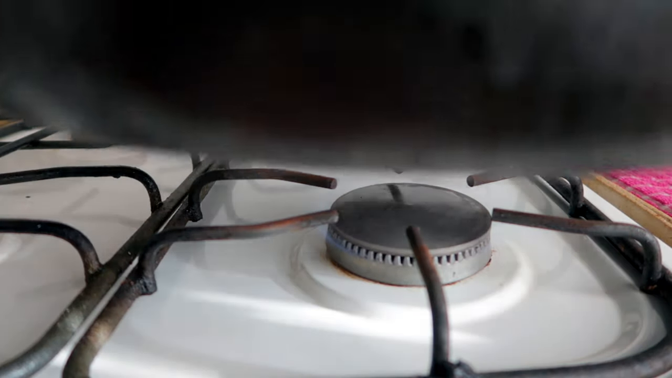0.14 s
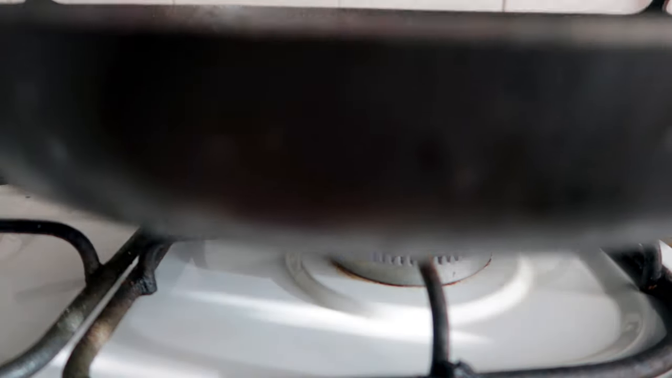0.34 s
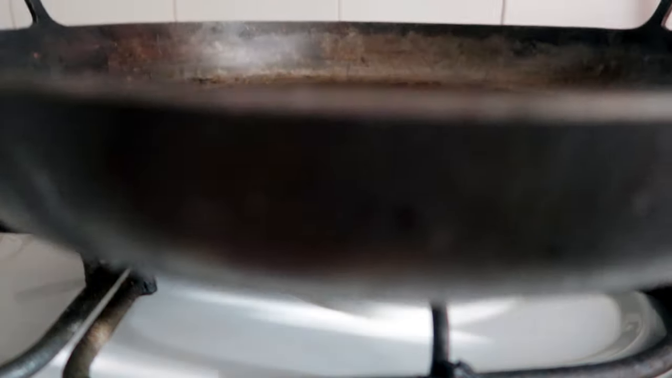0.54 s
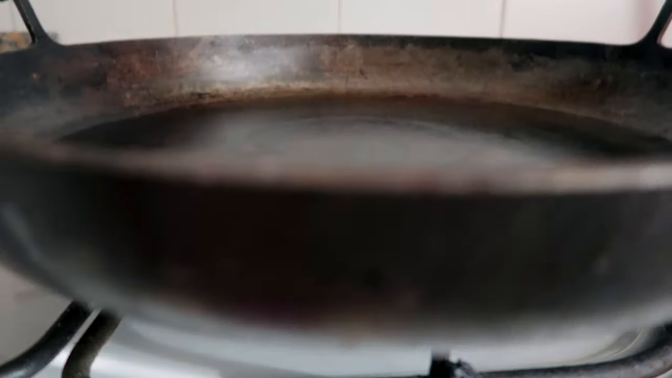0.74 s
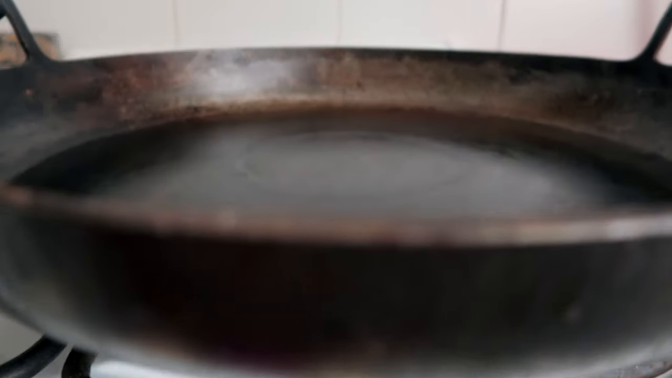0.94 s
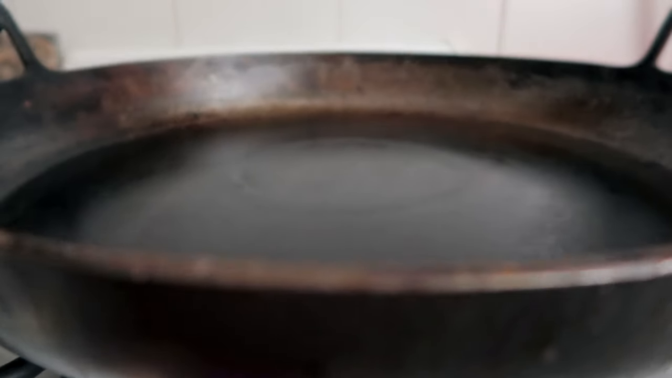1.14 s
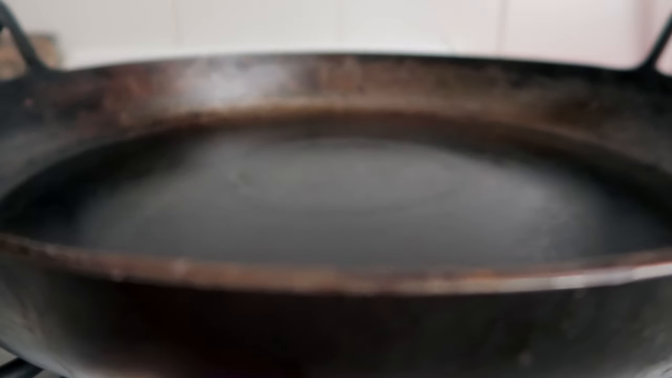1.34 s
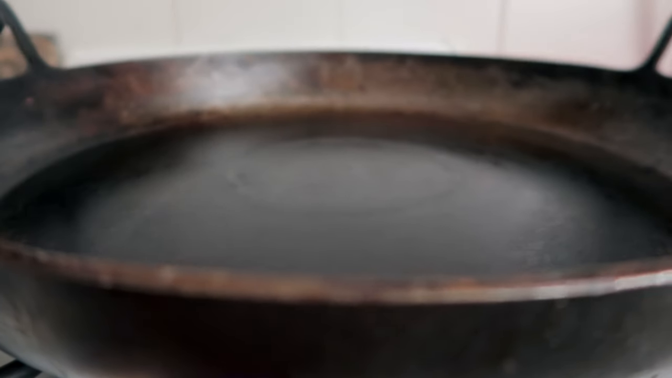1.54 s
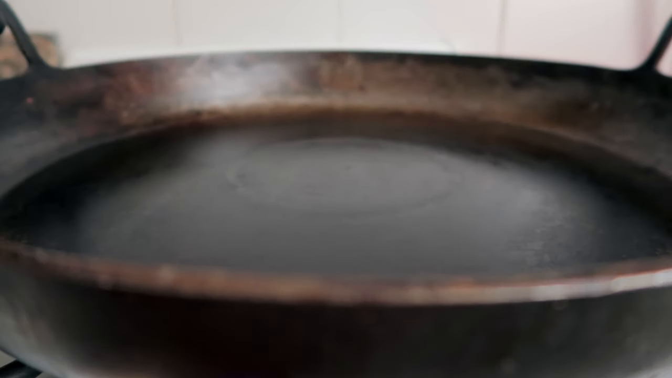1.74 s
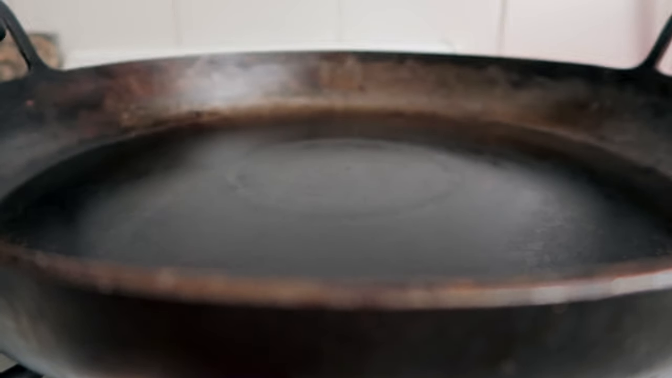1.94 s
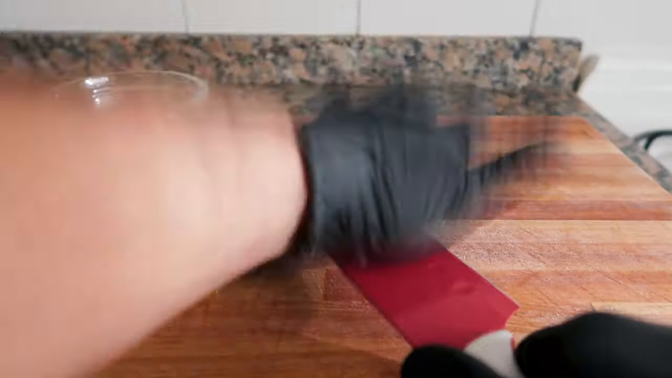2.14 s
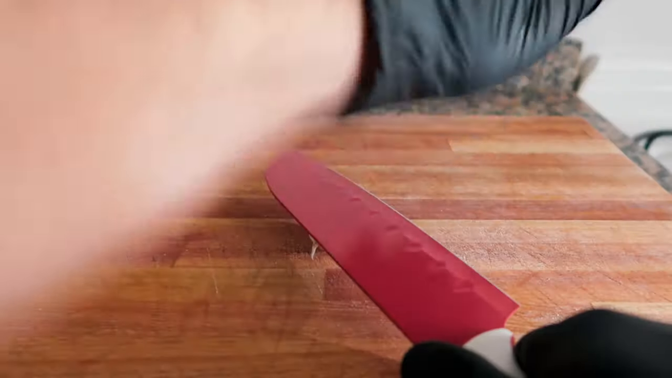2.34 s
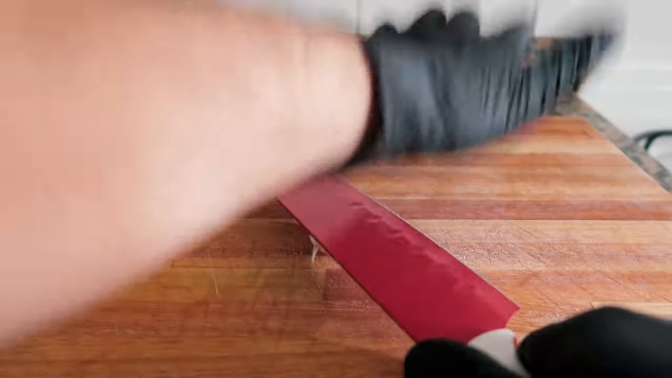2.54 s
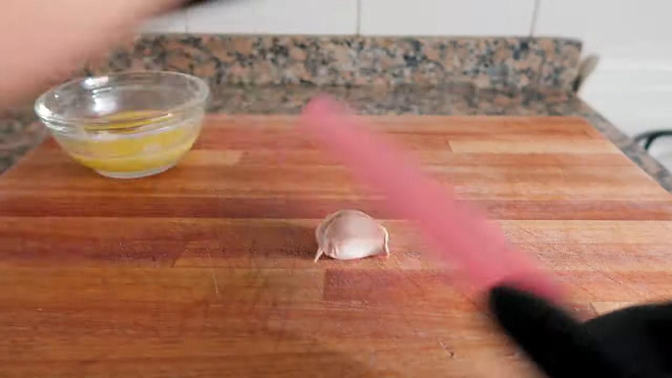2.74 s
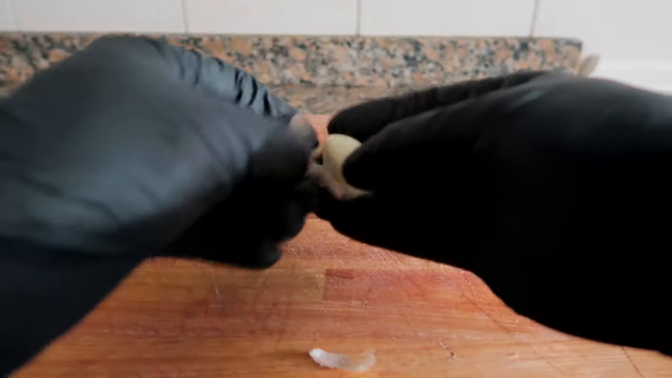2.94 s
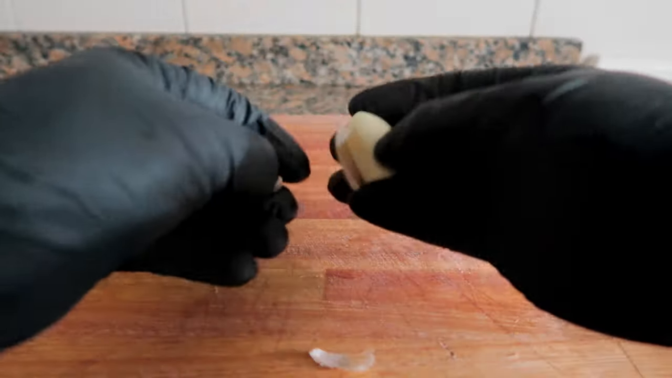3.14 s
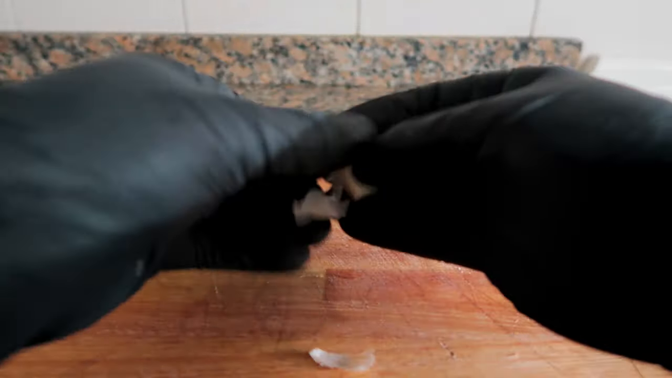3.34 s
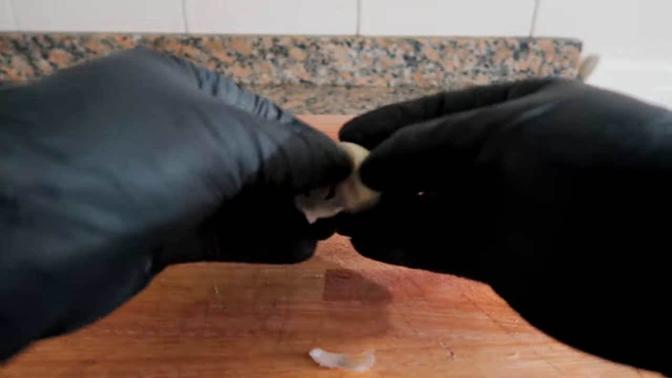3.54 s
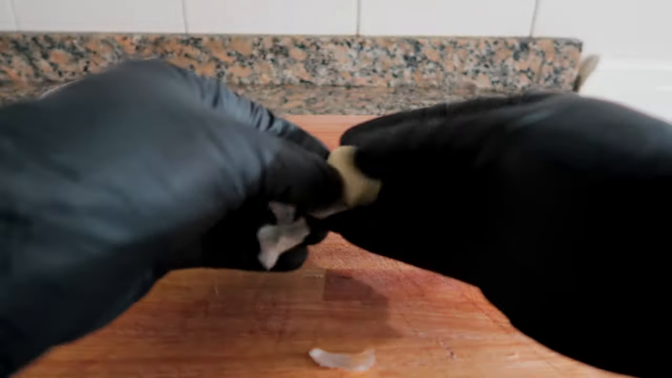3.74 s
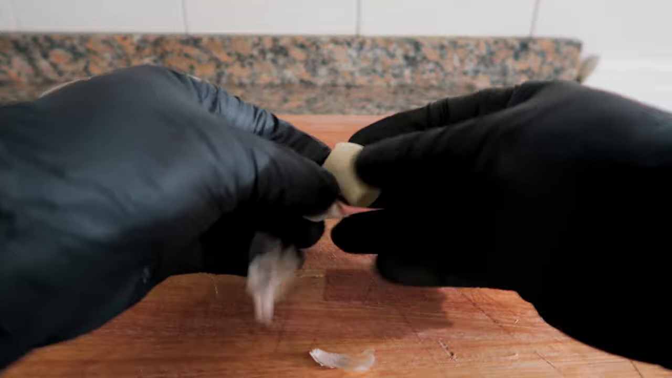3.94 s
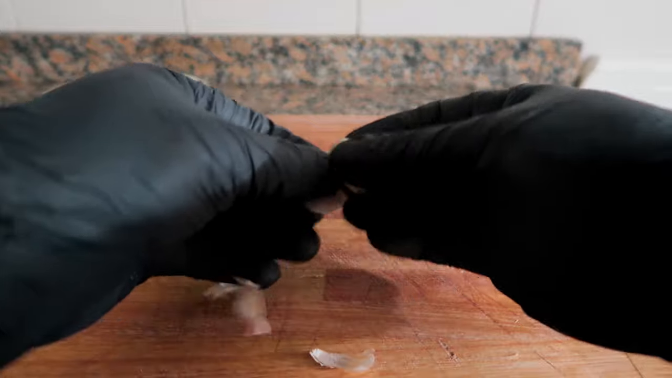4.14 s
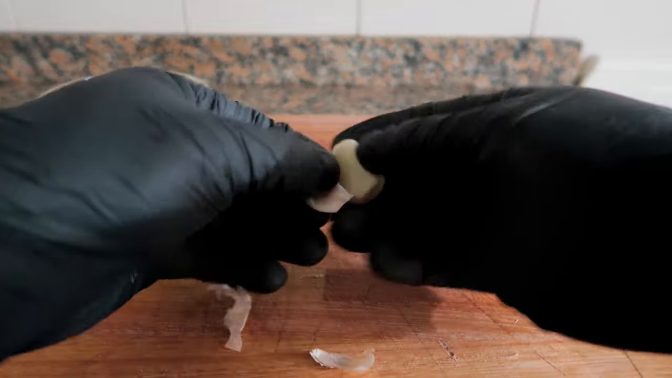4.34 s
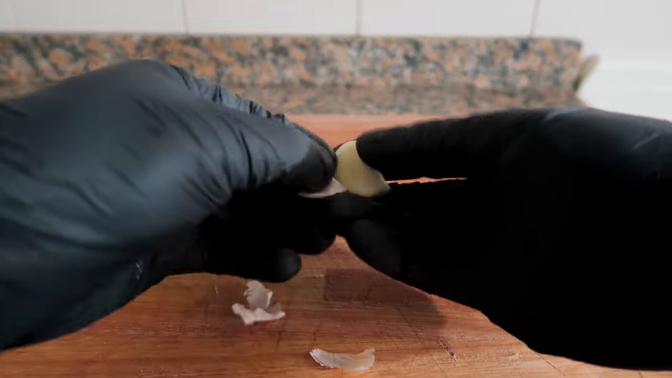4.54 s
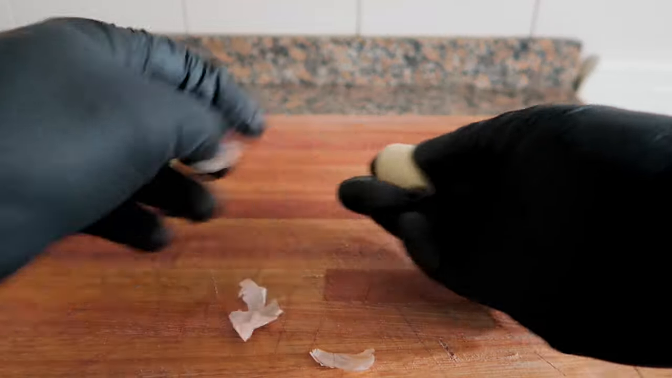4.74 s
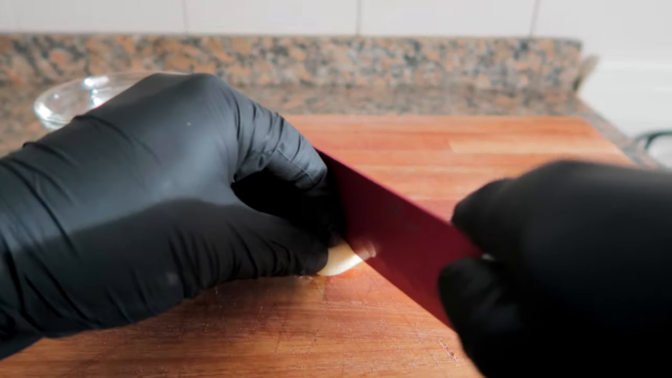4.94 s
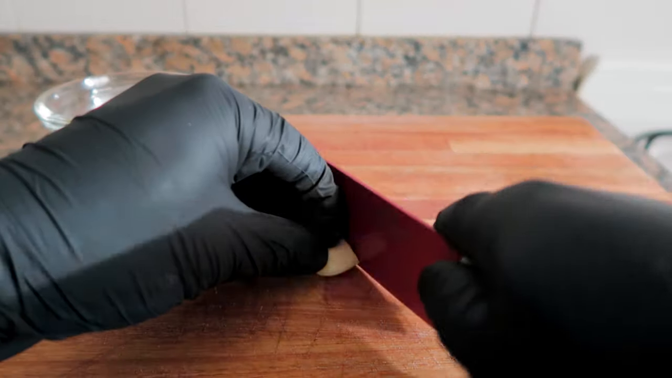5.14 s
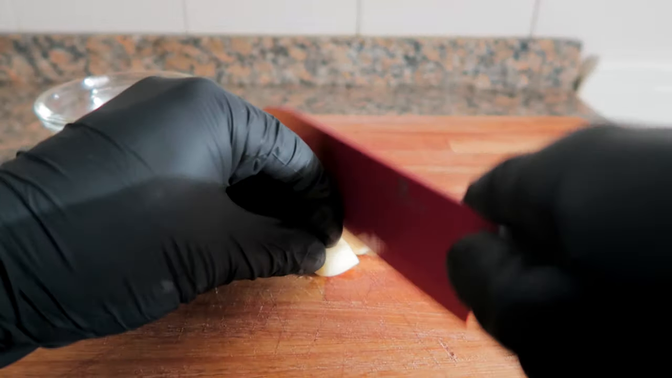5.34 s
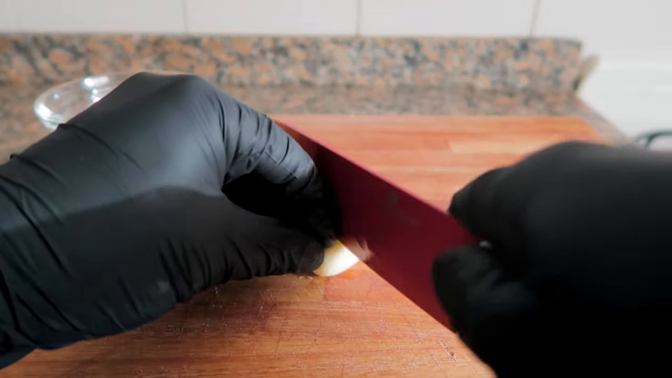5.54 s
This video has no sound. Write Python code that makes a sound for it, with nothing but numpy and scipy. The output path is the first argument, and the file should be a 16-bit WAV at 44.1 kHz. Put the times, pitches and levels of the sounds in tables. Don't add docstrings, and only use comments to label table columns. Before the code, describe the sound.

Close kitchen sounds: pan clunks down on a metal grate, flat blade smacks twice, dry peel snaps, and a knife knocks through to the board.

```python
import sys
import numpy as np
from scipy import signal
from scipy.fft import rfft, irfft
from scipy.io import wavfile
from scipy.ndimage import uniform_filter1d

SR = 44100
rng = np.random.default_rng(int(sys.argv[2]) if len(sys.argv) > 2 else 0)


def ratio_of_db(decibels):
    return 10 ** (np.asarray(decibels, float) / 20)


def unload_audio(sound):
    columns = np.transpose(np.atleast_2d(sound))
    steps = np.round(np.clip(columns, -1, 1) * 32767)
    wavfile.write(sys.argv[1], SR, steps.astype(np.int16))


N = 246519

# start_s, crack_db, body_db, rise_s, ring_db
PAN_BLOWS = [
    (1.1775, -10, -5.5, 0.0032, -7),
    (1.2585, -5, -8.5, 0.0053, -13),
    (1.6098, -23, -13.5, 0.0013, -18.5),
]
# pitch_hz, level_db (per Hz)
PAN_CRACK = [(150, -12), (844, -8), (1340, 6.5), (2230, -20), (4200, -3.5), (5330, -52), (15500, -75)]
# pitch_hz, level_db (per Hz)
PAN_BODY = [
    [(41, -42), (70, -11), (260, -1.5), (478, 0), (1350, -13.5), (2270, -16), (3120, -22), (4370, -25),
     (15500, -68)],
    [(41, -48), (70, -18), (254, -1.5), (641, -12.5), (840, -6.5), (2800, -18.5), (4400, -18.5),
     (5600, -32), (15500, -76)],
    [(41, -31), (70, -5), (300, -2), (717, -11), (1200, -9), (2030, -20.5), (4000, -28.5), (15500, -79)],
]
# pitch_hz, t60_s
PAN_DECAY = [(60, 0.86), (160, 0.98), (420, 0.68), (1100, 0.41), (2910, 0.33), (7680, 0.26)]
# pitch_hz, level_db, t60_s
PAN_TOUCH = [(139, -2.5, 0.21), (276, -2.5, 0.27), (459, 9, 0.1), (849, -8.5, 0.44), (1278, -13, 0.61),
             (1690, -9.5, .19), (1860, -6.5, 0.15), (2266, -10.5, 0.26), (3310, -18, 0.16),
             (3892, -16, 0.22), (4285, -19.5, 0.33), (4470, -28, .3)]
# pitch_hz, level_db, t60_s
PAN_LAND = [(841, -1, 0.68), (1296, -7, 0.82), (1524, -20, 1), (1856, -8, 0.56), (2250, -13.5, 0.73),
            (2940, -9, 0.33), (3350, -15.5, 0.6), (3450, -16, 0.52), (137.8, -9, 1.), (242, 3.5, 0.71),
            (281, 12, 0.17), (295, -2.5, 0.72), (803, 12, 0.11)]
# pitch_hz, level_db, t60_s
GRATE = [(3122, -16, .35), (3898, -6, .3), (3984, -12, .4), (4145, -15, .25), (4290, 2, .37),
         (4339, -1, .25), (5001, -11, .3), (5319, -16, .45), (5432, -23, .25), (6200, -18, .12),
         (7079, -26, .25), (8775, -30, .25)]
# pitch_hz, level_db, t60_s
PAN_ROCK = [(238, -1, 0.78), (276, -12, 0.28), (463, -2, 0.43), (845, -10, 1.93), (974, 16, 0.019),
            (1284, 0, 0.35), (1588, 1.5, 0.38), (1860, -7.5, 0.27), (2244, -18.5, 0.71), (2580, -9, 0.066),
            (3424, -14, 0.22), (4090, 6, 0.013)]


def pan_on_hob():
    rings = [PAN_TOUCH, PAN_LAND + GRATE, PAN_ROCK]
    struck = blows(PAN_BLOWS, PAN_CRACK, 0.094, PAN_BODY, PAN_DECAY, rings)
    return struck * np.interp(np.arange(N) / SR, [2.08, 2.18], [1, 0])


# start_s, crack_db, body_db, rise_s, ring_db
SLAPS = [
    (2.2745, -0.5, -12.5, 0.0068, -23),
    (2.5288, 8, -2.5, 0.0012, -11.5),
]
# pitch_hz, level_db (per Hz)
SLAP_CRACK = [(88, -35), (150, -8), (583, -19), (1290, 2.5), (2600, 0.5), (4650, -13.5), (5650, -15.5),
              (12300, -22.5), (15500, -21)]
# pitch_hz, level_db (per Hz)
SLAP_BODY = [
    [(18, -37), (30, 3.5), (123, -3), (830, -22.5), (945, -32), (1330, -20), (1870, -21.5), (2360, -18),
     (3880, -29), (15500, -35.5)],
    [(18, -37), (30, -6.5), (230, -0.5), (307, -15.5), (852, -18), (1050, -17.5), (1170, -17.5),
     (2760, -13.5), (3680, -17.5), (15500, -31)],
]
# pitch_hz, t60_s
SLAP_DECAY = [(40, 0.16), (110, 0.6), (280, 0.55), (740, 0.39), (1940, 0.37), (5120, 0.38), (13500, 0.19)]
# pitch_hz, level_db, t60_s
SLAP_RING = [
    [(52, 5.5, 0.67), (115.3, 7.5, 0.35), (185, -15, 0.25), (1138, -14, 0.46), (1600, -7, 0.19),
     (2070, -10, 0.48), (2360, -8, 0.42), (2400, -5, .2), (2890, 5, .14), (4800, -16, .18)],
    [(57.2, -0.5, 0.63), (72, -2.5, 0.76), (123, -19, 0.36), (163, -2, 0.7), (212, -9, 0.45),
     (245.4, -0.5, 0.46), (926, -1, 0.19), (1252, -5, 0.29), (1716, -14, 0.24), (2385, -6, 0.35),
     (2800, -4, 0.28), (4060, -10, 0.25), (4350, -12, 0.42), (4900, -12, .27)],
]


def knife_slaps():
    return blows(SLAPS, SLAP_CRACK, 0.042, SLAP_BODY, SLAP_DECAY, SLAP_RING)


# start_s, crack_db, body_db, rise_s, ring_db
CHOP = [
    (5.176, 8.5, -3, 0.0017, -9),
]
# pitch_hz, level_db (per Hz)
CHOP_CRACK = [(150, -6.5), (600, -38), (930, 1), (1120, -6), (1350, 4), (1750, -10), (3000, -20),
              (15500, -44)]
# pitch_hz, level_db (per Hz)
CHOP_BODY = [
    [(18, -32), (30, -40), (148, -12), (230, -6), (455, -14), (747, -10.5), (1230, -6), (1720, -19),
     (2020, -22), (3880, -42), (15500, -62)],
]
# pitch_hz, t60_s
CHOP_DECAY = [(60, 0.82), (160, 0.58), (420, 0.45), (1100, 0.39), (2910, 0.44), (7680, 0.16)]
# pitch_hz, level_db, t60_s
CHOP_RING = [
    [(235.4, 3.5, 0.47), (356, 1.5, 0.28), (548, -4, 0.35), (693, -15, .26), (814, -16, 0.43),
     (892, 7, 0.19), (1054, -8, 0.36), (1126, -3, 0.29), (1214, 4, 0.31), (1274, 3, 0.27), (1440, -7, 0.34),
     (1478, -5, 0.36), (1575, -10.5, 0.42), (2067, -6, .22)],
]


def chop():
    return blows(CHOP, CHOP_CRACK, 0.037, CHOP_BODY, CHOP_DECAY, CHOP_RING)


def blows(rows, crack, crack_t60, bodies, decay, rings):
    out, t = np.zeros(N), np.arange(SR) / SR
    for (s, crack_db, body_db, rise, ring_db), colour, modes in zip(rows, bodies, rings):
        contact = evened(coloured(rng.standard_normal(SR), crack))
        hit = ratio_of_db(crack_db - 60 * t / crack_t60) * contact
        hit += ratio_of_db(body_db) * body(colour, decay, rise)
        for hz, db, t60 in modes:
            fall = ratio_of_db(ring_db + db - 60 * t / min(t60, 1.7))
            hit += fall * swell(t, hz, rise) * np.sin(2 * np.pi * hz * t)
        add(out, s, hit)
    return out


def body(colour, decay, rise):
    lump_db, lump_bins = 1.5, 45
    t, hz = np.arange(SR) / SR, np.fft.rfftfreq(SR, 1 / SR)
    lumps = ratio_of_db(lump_db * evened(uniform_filter1d(rng.standard_normal(len(hz)), lump_bins)))
    noise = rfft(evened(coloured(rng.standard_normal(SR), colour)))
    noise = noise * lumps / np.sqrt(np.mean(lumps ** 2))
    centres, out = [f for f, _ in decay], np.zeros(SR)
    for share, (f, t60) in zip(np.eye(len(decay)), decay):
        part = irfft(noise * read(list(zip(centres, share)), hz), SR)
        out += part * ratio_of_db(-60 * t / t60) * swell(t, f, rise)
    return out


def swell(t, hz, rise):
    return 1 - np.exp(-t / (abs(rise) * np.sqrt(500 / hz) + 1e-4))


# start_s, peak_db, pitch_hz, treble_db (against the ring)
SNAPS = [(2.9579, -17, 4540, -5), (3.0203, -16, 3830, -4), (3.044, -1, 4390, -1), (3.0646, -14, 4570, -1),
         (3.0706, -15, 1660, -7), (3.0783, -14, 3790, 0), (3.1202, -4, 3920, -3), (3.1248, -6, 3770, -6),
         (3.1368, -2, 1460, -2), (3.2163, -10, 2890, 7), (3.2231, -14, 3320, 7), (3.2422, -19, 2970, -3),
         (3.3014, -11, 3140, -1), (3.48, -23, 7000, 3), (3.6869, -16, 2970, 3), (3.699, -10, 2990, -3),
         (3.7099, -11, 2970, 5), (3.7144, -13, 3060, 3), (3.7214, -10, 3100, 3), (3.728, -15, 3060, -1),
         (3.771, -19, 3850, -5), (3.8488, -8, 5340, 6), (3.9882, -9, 5920, 3), (3.9948, -14, 2220, -10),
         (4.0198, -5, 1940, 7), (4.0286, -12, 1680, 1), (4.1003, -8, 2400, 0), (4.218, -10, 2130, 3),
         (4.3281, -20, 5040, 7), (4.3809, -25, 4410, -4)]
# start_s, peak_db, pitch_hz
TICKS = [(0.4723, -29, 10200), (2.2508, -28, 3770), (2.7323, -20, 2110), (2.7543, -16, 2520),
         (2.77, -22, 3730), (4.6043, -26, 8000), (4.6711, -22, 4350), (5.0204, -20, 6500),
         (5.0351, -19, 4590), (5.0511, -11, 4290), (5.0566, -12, 4410), (5.17, -10, 5500),
         (5.1725, -8, 5000), (5.5106, -24, 2330)]
# start_s, peak_db, pitch_hz, treble_db
CRUMBS = [(2.8421, -39, 3920, -1), (2.8504, -32, 3270, -8), (2.874, -33, 4650, -1),
          (2.8789, -27, 1980, -2), (2.9025, -31, 4050, -5), (2.9659, -21, 4570, 0),
          (2.97, -29, 5470, -1), (3.0155, -24, 4480, -2), (3.0378, -16, 4310, 6),
          (3.0478, -16, 5470, 0), (3.0816, -14, 3700, 0), (3.133, -10, 2240, 3),
          (3.1414, -5, 1510, -6), (3.1445, -5, 1510, -10), (3.2301, -18, 3060, 4),
          (3.2334, -24, 2890, -1), (3.2375, -19, 2930, -7), (3.3043, -15, 3140, -1),
          (3.308, -18, 1640, 7), (3.3176, -24, 2070, -2), (3.3312, -23, 5170, -10),
          (3.3759, -29, 5770, 1), (3.4016, -31, 2330, 1), (3.4137, -33, 2580, -1),
          (3.4389, -33, 6290, 4), (3.445, -30, 4220, 0), (3.4575, -28, 3230, -10),
          (3.4675, -33, 8610, 0), (3.5359, -29, 4650, -6), (3.554, -27, 4390, 0),
          (3.5592, -22, 2280, -7), (3.5887, -26, 3140, -1), (3.6023, -30, 2500, -3),
          (3.6105, -20, 2240, 1), (3.6191, -22, 7540, -3), (3.6242, -27, 2930, 1),
          (3.6279, -28, 3450, 0), (3.6442, -31, 2020, -3), (3.6815, -22, 3010, -4),
          (3.6949, -17, 3100, -5), (3.7934, -31, 2200, -5), (3.8048, -31, 3270, -10),
          (3.8575, -20, 5770, 0), (3.8889, -25, 2710, -10), (3.9821, -31, 5210, -1),
          (4.0007, -16, 2150, -10), (4.0044, -17, 2200, -10), (4.0339, -9, 7360, 2),
               (4.192, -35, 2540, -5), (4.2029, -29, 2500, -8), (4.2242, -21, 2280, 7),
               (4.2412, -28, 8140, 5), (4.2755, -23, 2110, -2), (4.295, -19, 2580, 2),
               (4.3149, -31, 2330, -5), (4.3221, -29, 4260, 0), (4.3339, -25, 2020, 4),
               (4.3399, -28, 1770, 3), (4.3461, -23, 2630, 3), (4.3501, -25, 6980, 6),
               (4.3544, -30, 1720, 6), (4.3617, -29, 3100, -10), (4.3979, -32, 3830, 0),
               (4.4237, -27, 4910, -7), (4.4304, -30, 1720, -1), (4.4912, -34, 4440, 4),
               (4.5075, -39, 1890, -1), (4.5251, -32, 2150, -1), (4.5315, -35, 1810, -6),
               (4.5485, -36, 1810, -7), (4.5627, -34, 4220, -8), (4.5931, -35, 2630, 4),
               (4.6114, -34, 4910, -1), (4.6201, -29, 5680, 2), (4.6283, -26, 3620, -3),
               (4.7059, -32, 1640, 2), (4.7727, -27, 6200, 0), (4.7903, -28, 4480, -8),
               (4.8326, -30, 2450, -7), (4.8639, -31, 4870, -4), (4.9083, -23, 3830, -8),
               (4.9703, -24, 8870, 0), (4.9737, -20, 4130, 1), (4.9796, -19, 5730, -1),
               (4.9905, -21, 8660, 0), (5.0046, -22, 4180, -6), (5.0247, -22, 4050, 0),
               (5.042, -18, 5040, -4), (5.11, -23, 1640, 4), (5.1332, -14, 3700, 0)]


def snaps():
    out, t = np.zeros(N), np.arange(600) / SR
    tick_treble_db = -3.5
    crumb_db = -2.5
    rows = SNAPS + [row + (tick_treble_db,) for row in TICKS]
    rows = rows + [(s, db + crumb_db, *rest) for s, db, *rest in CRUMBS]
    for s, db, hz, treble_db in rows:
        noise = rng.standard_normal(600)
        impulse = np.sign(noise) * (t == 0)
        fracture = (impulse + 0.25 * noise) * ratio_of_db(-60 * t / 0.0057)
        snap = skin(fracture, hz, treble_db + 4.5, 1.12)
        snap *= ratio_of_db(db + 1) / abs(snap).max()
        add(out, s, snap)
        add(out, s + 0.001274, 0.062 * snap)
    return out


# start_s, level_db, t60_s, pitch_hz, treble_db
SCRAPES = [(2.961, -46, 0.12, 4600, -13), (3.046, -20, 0.019, 1150, -22), (3.06, -34, 0.56, 1860, 4),
           (3.141, -29.5, 0.056, 785, -30), (3.1425, -6.5, 0.018, 1570, -13),
           (3.304, -29.5, 0.054, 2560, 2), (3.355, -55.5, 0.097, 3500, 20), (3.483, -57, 0.062, 3370, 24),
           (3.534, -46.5, 0.26, 4300, 3.5), (3.687, -35.5, 0.041, 3000, 7.5), (3.727, -37.5, 0.16, 2580, 7),
           (3.848, -44.5, 0.12, 3950, 14), (3.996, -28, 0.049, 2140, -7), (4.034, -28, 0.062, 2310, 6),
           (4.1, -30, 0.09, 2800, 2), (4.219, -39, 0.024, 2300, -11), (4.275, -39, 0.43, 1920, -0.5),
           (4.425, -43, 0.085, 4670, -8), (4.679, -44, 0.075, 4300, -14), (4.745, -39, 0.16, 4400, 2.5)]
# start_s, level_db, t60_s, pitch_hz, treble_db
SLIDES = [
    (2.319, -25.5, 0.056, 2860, -2),
    (2.755, -39, 0.072, 3040, 6.5),
    (4.91, -43.5, 0.29, 7240, -1),
    (4.975, -40, 0.46, 8460, -5),
    (5.041, -38, 1, 245, -40),
    (5.054, -38.5, 0.095, 4320, 5.5),
    (5.057, -41, .4, 95, -40),
    (5.125, -45.5, 0.43, 3670, 11.5),
    (5.173, -27, 0.065, 5750, 3.5),
    (5.511, -42.5, 0.045, 2430, 6.5),
]


def scrapes():
    out, t = np.zeros(N), np.arange(-4000, 9000) / SR
    for s, db, t60, hz, treble_db in SCRAPES + SLIDES:
        rise = min(0.12 * t60, 0.025)
        shape = np.where(t < 0, np.exp(np.minimum(t, 0) / rise), ratio_of_db(-60 * t / t60))
        rubbed = skin(slips(len(t), 3.2), hz, treble_db, 1.3)
        add(out, s + t[0], ratio_of_db(db) * shape * rubbed)
    return out


def skin(x, hz, treble_db, width):
    ring = band(band(x, hz / width, hz * width), hz / 3.7, hz * 2.9)
    edge = band(band(x, 1600, 20600), 1200, 13600)
    return evened(ring) + ratio_of_db(treble_db) * evened(edge)


def slips(n, spread_db):
    return rng.standard_normal(n) * ratio_of_db(spread_db * np.minimum(rng.exponential(1, n), 5))


# start_s, pitch_hz, level_db, t60_s
KNOCK = (3.1445, 1520, -19, .1)


def knock(s, hz, db, t60):
    t = np.arange(SR // 4) / SR
    return s, ratio_of_db(db - 60 * t / t60) * np.sin(2 * np.pi * hz * t)


# start_s, level_db
RUSTLE = [(2.7, -59), (3.0, -39), (3.17, -39), (3.32, -44), (3.58, -42.5), (3.81, -42.5), (3.93, -47.5),
          (4.06, -40.5), (4.22, -49), (4.42, -48.5), (4.62, -46.5), (4.85, -44.5), (4.96, -44.5),
          (5.05, -30.5), (5.095, -38), (5.13, -33.5), (5.17, -22), (5.21, -34), (5.41, -64), (5.59, -47)]
# pitch_hz, level_db (per Hz)
RUSTLE_COLOUR = [(500, -5.5), (1000, -1), (1700, 3), (2900, -4.5), (4300, 3), (5800, -1), (7800, 8),
                 (15500, -5)]


def rustle():
    t = np.arange(N) / SR
    x = patchy(coloured(slips(N, 3.2), RUSTLE_COLOUR), 1.7)
    low = signal.sosfilt(signal.butter(2, 5500, fs=SR, output="sos"), x)
    flutter_db = 2.6 * evened(uniform_filter1d(rng.standard_normal(N), 500))
    pressure_db = np.interp(t, *np.transpose(RUSTLE), left=-90)
    return ratio_of_db(pressure_db + flutter_db) * (evened(low) + ratio_of_db(-5) * evened(x - low))


def room(x):
    colour = [(300, -11.5), (3000, -8.0), (15000, -6.5)]  # pitch_hz, level_db
    decay = [(500, 0.28), (2500, 0.21), (9000, 0.11)]  # pitch_hz, t60_s
    tail = body(colour, decay, 0.005)
    return signal.fftconvolve(x, tail / np.linalg.norm(tail))[:N]


# start_s, level_db
HISS = [
    (0, -34),
    (.12, -37.5),
    (1.1, -38),
    (2.08, -40),
    (2.14, -45.5),
    (2.19, -58),
]
# pitch_hz, level_db (per Hz)
HISS_BED = [(24, -45), (40, -9), (136, 9), (300, 0.5), (410, -0.5), (637, 1.5), (1130, -12), (1680, 2.5),
            (2570, -7), (3060, -16.5), (15500, -24)]
# pitch_hz, width_hz, level_db
HISS_PEAKS = [(659, 19, -7), (1530, 110, -22), (1663, 34, -1), (2532, 37, -2), (2664, 86, -1.5),
              (3980, 470, -17.5), (5060, 110, -19.5), (6850, 230, -19), (7950, 210, -19.5),
              (9770, 200, -20.5), (10700, 120, -22), (12080, 220, -22), (13700, 240, -30),
              (15300, 210, -19)]
SHIELD_S = (.1, 0.63)
# pitch_hz, level_db
OPEN_COLOUR = [(500, -2), (2000, -2.5), (3200, 4), (5500, 2), (9000, 0.5)]


def hiss():
    hz, t = np.fft.rfftfreq(N, 1 / SR), np.arange(N) / SR
    air = rfft(rng.standard_normal((2, N)))

    def duct(pitch):
        gain = ratio_of_db(read(HISS_BED, hz) - 1.5)
        for f, width, db in HISS_PEAKS:
            gain = gain + ratio_of_db(db + 6.5) / np.sqrt(1 + (2 * (hz - f * pitch) / width) ** 2) ** 1.95
        return gain

    unshielded = irfft(air[0] * duct(0.95) * ratio_of_db(read(OPEN_COLOUR, hz)), N)
    shielded = irfft(air[1] * duct(1), N)
    turn = np.interp(t, SHIELD_S, [0, np.pi / 2])
    x = np.cos(turn) * unshielded + np.sin(turn) * shielded
    return ratio_of_db(np.interp(t, *np.transpose(HISS), right=-90) - 3.0) * patchy(x, 1.4)


# pitch_hz, level_db (per Hz)
AIR = [(41, -37), (70, -6.5), (185, 1.5), (641, -14.5), (860, -16), (1850, -18), (2980, -23), (4370, -23.5),
       (15500, -32)]


def quiet_air():
    return ratio_of_db(-47) * patchy(coloured(rng.standard_normal(N), AIR), 1.0)


# start_s, pitch_hz, level_db
DRONES = [
    [(.17, 111, -46), (.235, 109, -44.5), (.3, 110, -52)],
    [(3.12, 148, -45), (3.192, 153.6, -45), (3.46, 157, -53)],
    [(4.72, 173.3, -53), (4.92, 172.4, -43.5), (4.98, 163, -48)],
]
# start_s, pitch_hz, level_db
BIRD = [
    (5.29, 3680, -54),
    (5.35, 3690, -49),
    (5.395, 3610, -60),
    (5.42, 3570, -55),
    (5.5, 3490, -59),
    (5.58, 3450, -62),
]


def tone(rows, waver):
    s, hz, db = np.transpose(rows)
    t = np.arange(s[0], s[-1], 1 / SR)
    hz = np.interp(t, s, hz) * (1 + waver * evened(uniform_filter1d(rng.standard_normal(len(t)), 300)))
    sine = np.sqrt(2) * np.sin(2 * np.pi * np.cumsum(hz) / SR)
    return s[0], ratio_of_db(np.interp(t, s, db)) * sine * signal.windows.tukey(len(t), .15)


def patchy(x, depth_db):
    z = signal.stft(x, nperseg=512)[2]
    patches = uniform_filter1d(uniform_filter1d(rng.standard_normal(z.shape), 5, 0), 14, 1)
    return evened(signal.istft(z * ratio_of_db(depth_db * evened(patches)), nperseg=512)[1][:N])


def coloured(x, colour):
    return irfft(rfft(x) * ratio_of_db(read(colour, np.fft.rfftfreq(len(x), 1 / SR))), len(x))


def band(x, lo_hz, hi_hz):
    edges = [lo_hz, min(hi_hz, SR / 2.1)]
    return signal.sosfilt(signal.butter(1, edges, "band", fs=SR, output="sos"), x)


def read(points, hz):
    f, value = np.transpose(points)
    return np.interp(np.log(hz + 1), np.log(f + 1), value)


def evened(x):
    return x / np.sqrt(np.mean(x ** 2) + 1e-20)


def add(mix, s, sound):
    part = mix[round(s * SR):][:len(sound)]
    part += sound[:len(part)]


def scene():
    hands = snaps() + scrapes()
    add(hands, *knock(*KNOCK))
    out = pan_on_hob() + knife_slaps() + chop()
    out += hands + ratio_of_db(-9.5) * room(hands) + rustle()
    out += hiss() + quiet_air()
    for rows in DRONES:
        add(out, *tone(rows, 0.0091))
    add(out, *tone(BIRD, .016))
    return out[None]


def band_limit(x):
    return signal.sosfilt(signal.butter(12, 16800, fs=SR, output="sos"), x)


def record(dry):
    low_pass = signal.firwin(511, 15800, window=("kaiser", 9), fs=SR)
    x = signal.oaconvolve(dry, low_pass[None], "same")
    x = signal.sosfilt(signal.butter(2, 35, "high", fs=SR, output="sos"), x)
    x = x / (1 + abs(x) ** 8) ** (1 / 8)
    return band_limit(x)


dry = scene()
out = record(dry)
unload_audio(out)
```